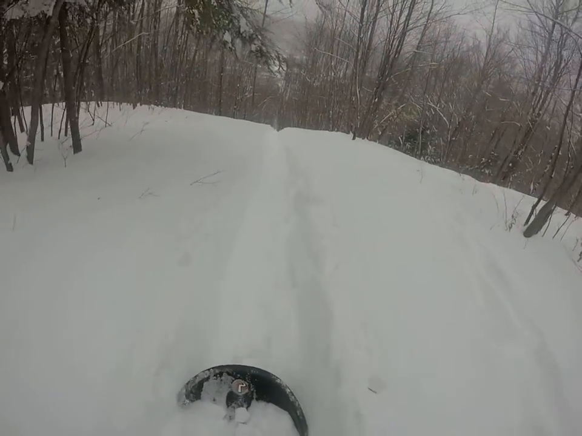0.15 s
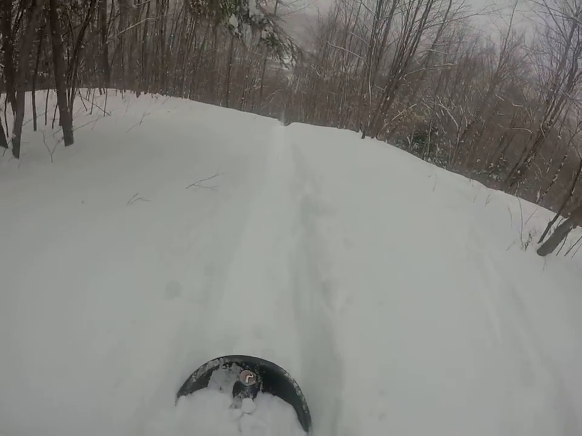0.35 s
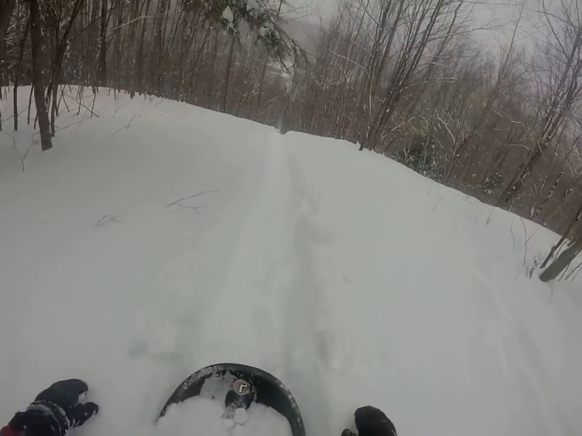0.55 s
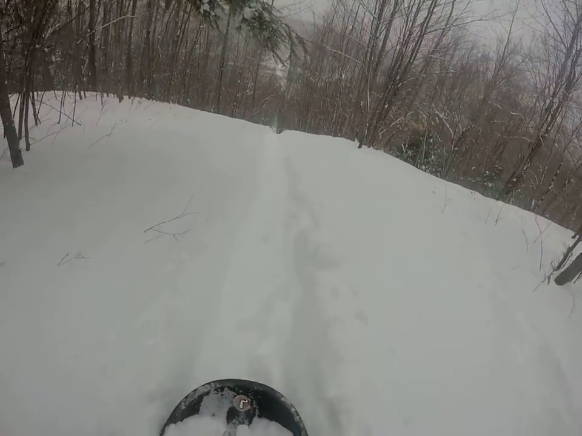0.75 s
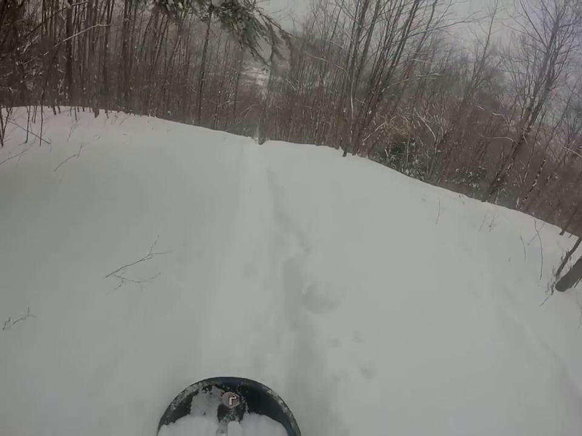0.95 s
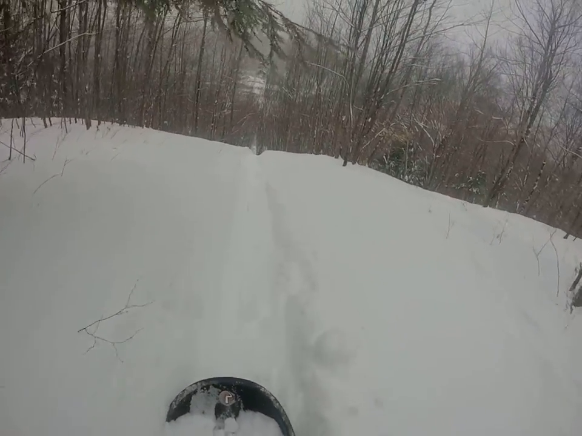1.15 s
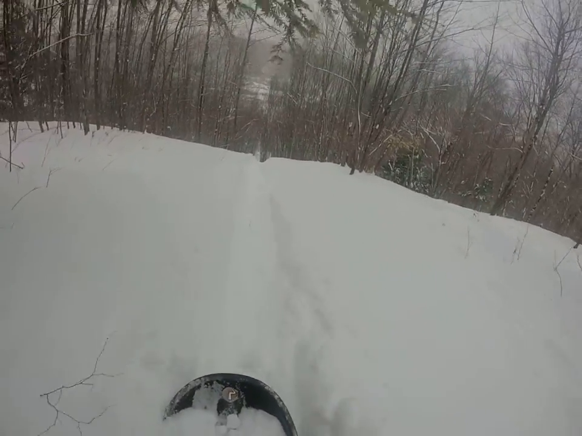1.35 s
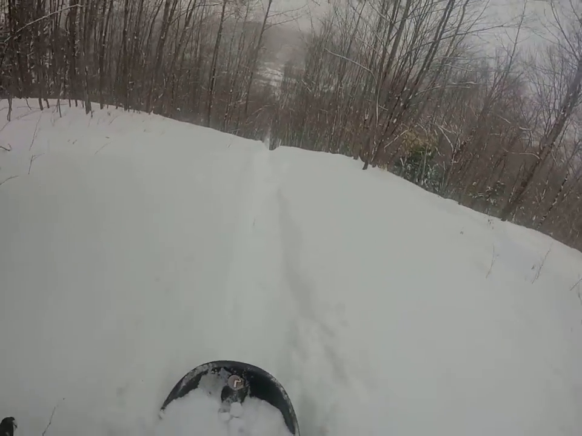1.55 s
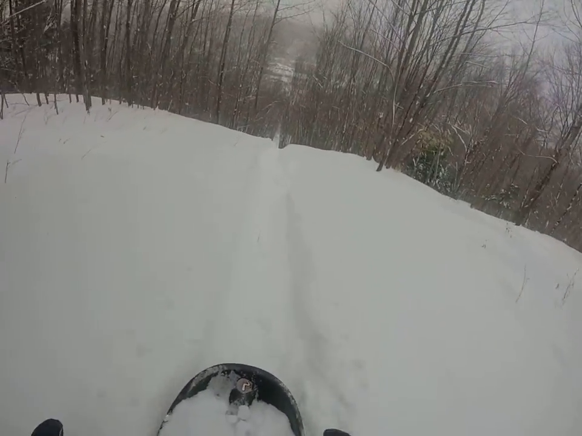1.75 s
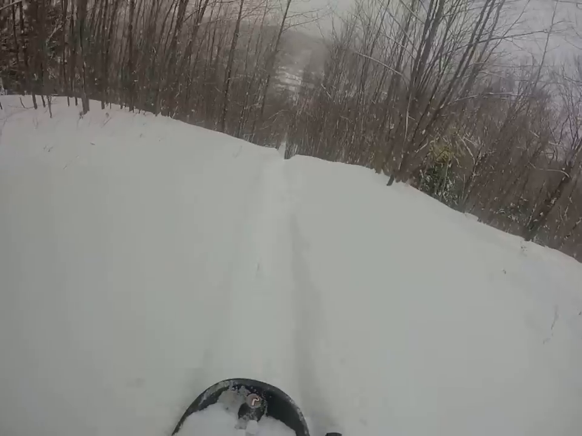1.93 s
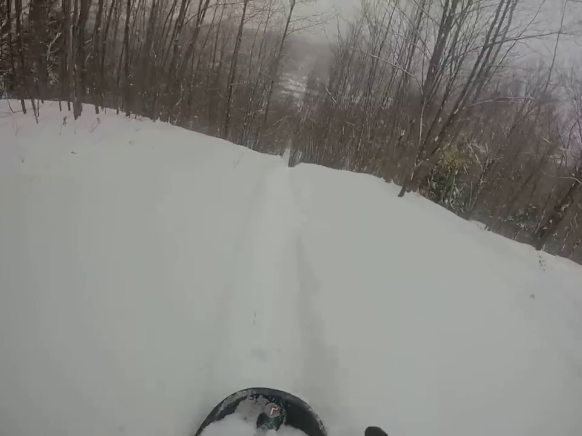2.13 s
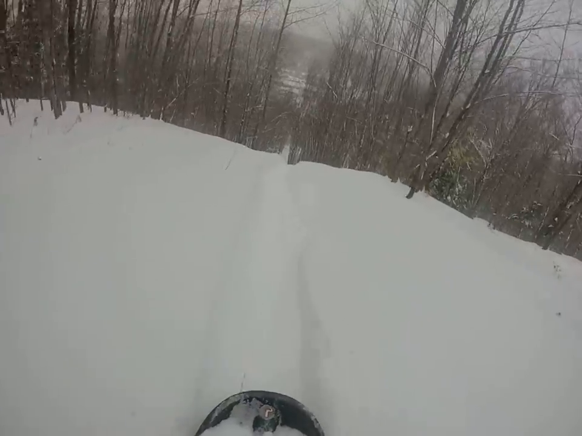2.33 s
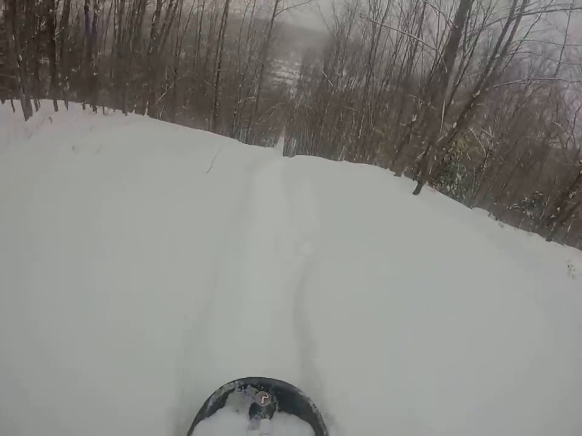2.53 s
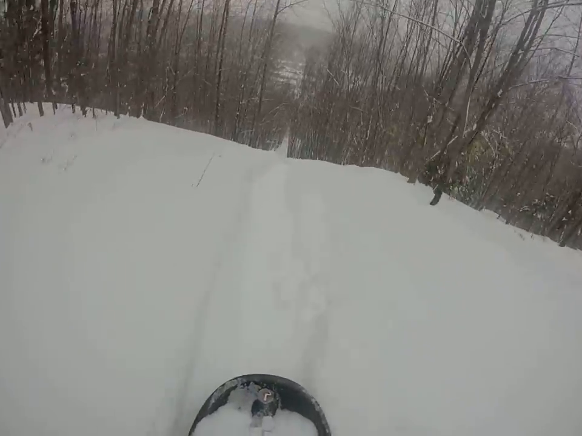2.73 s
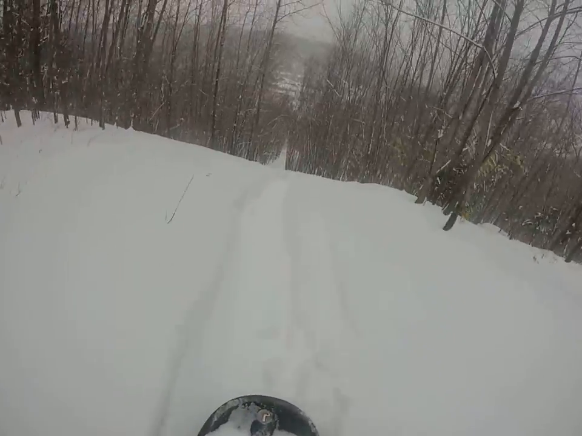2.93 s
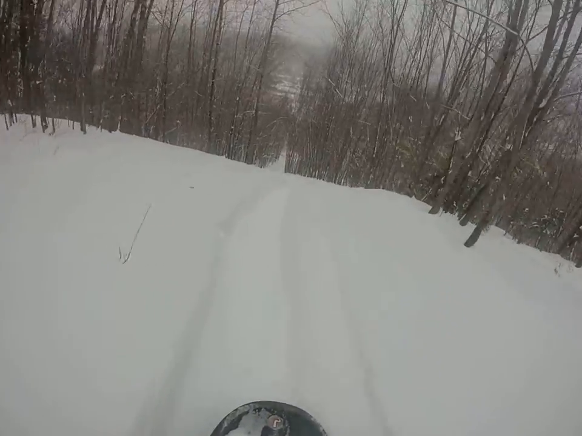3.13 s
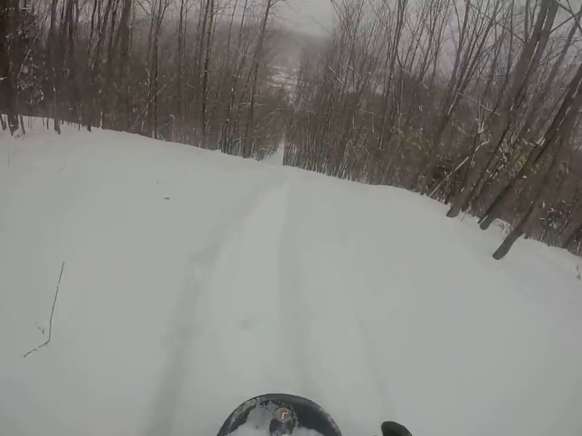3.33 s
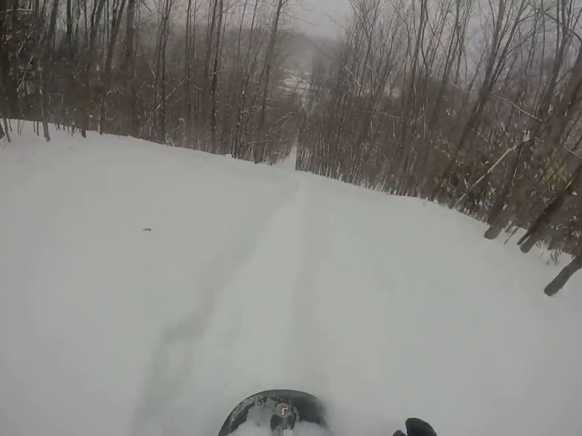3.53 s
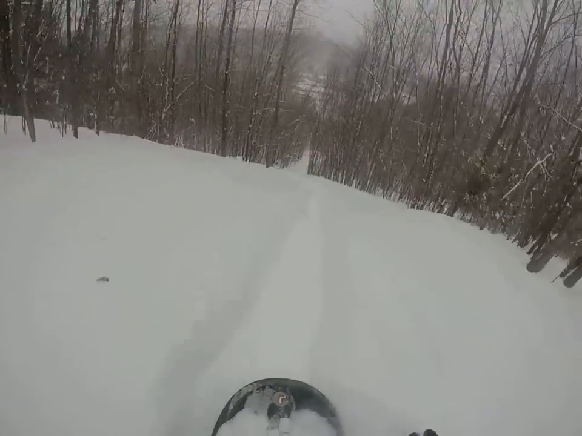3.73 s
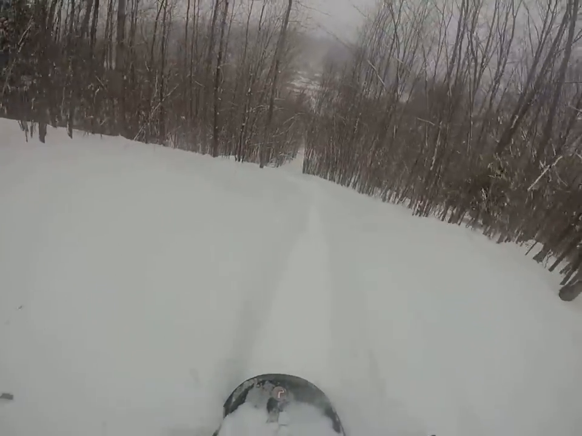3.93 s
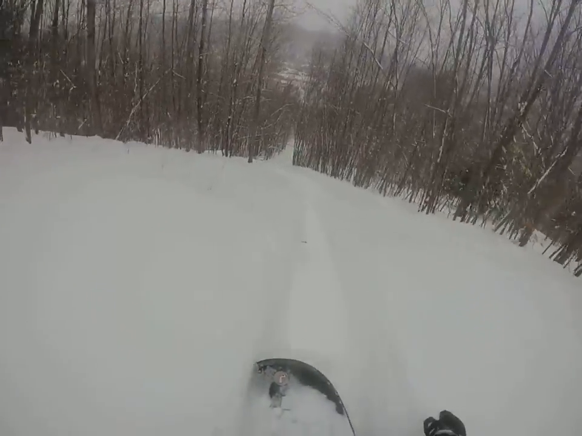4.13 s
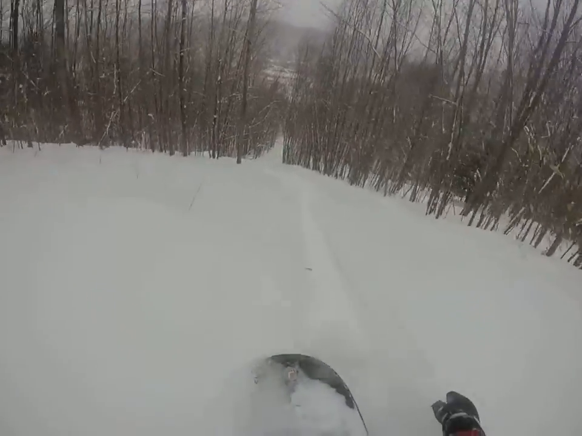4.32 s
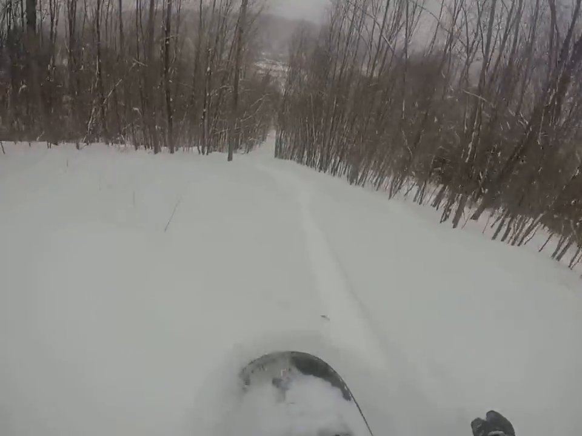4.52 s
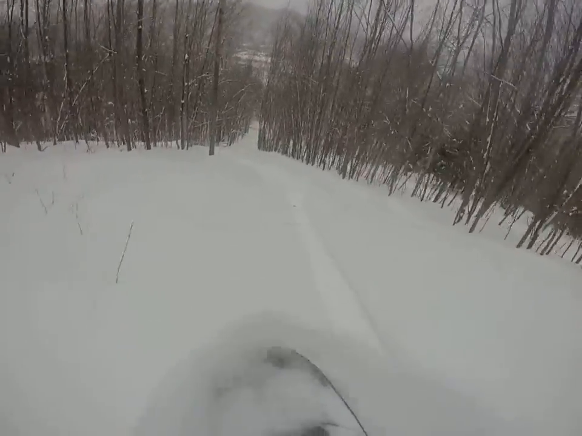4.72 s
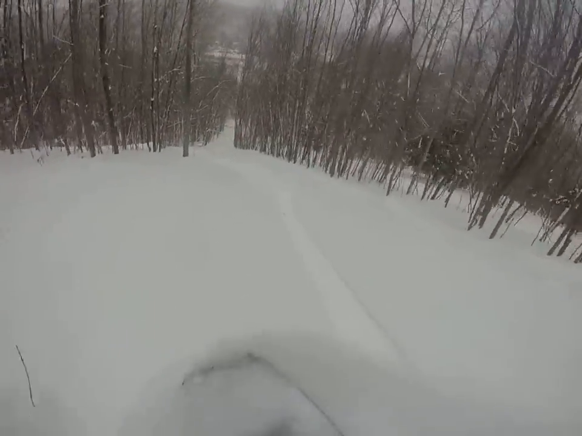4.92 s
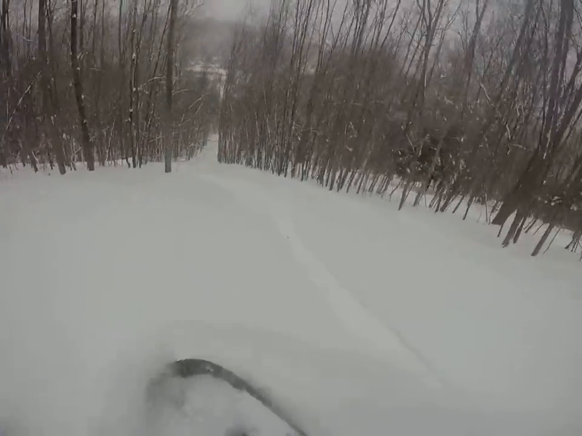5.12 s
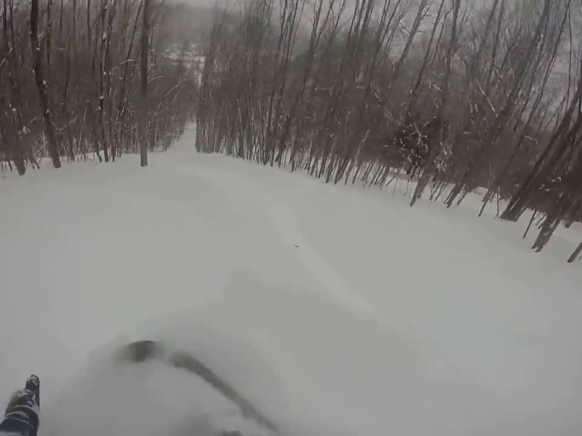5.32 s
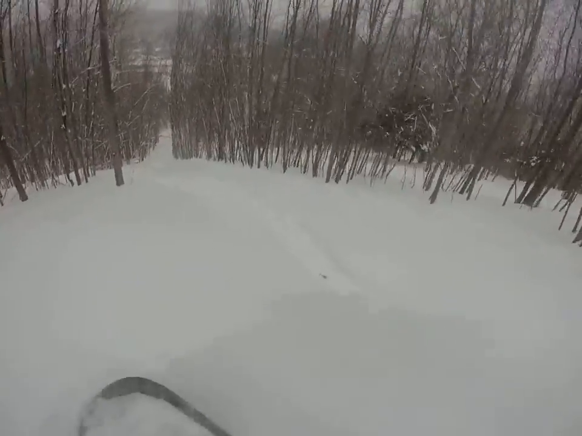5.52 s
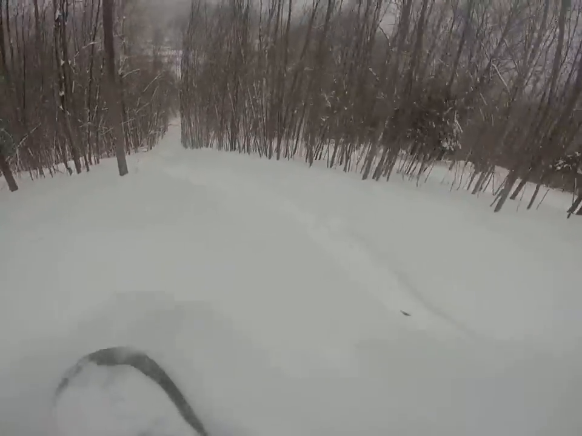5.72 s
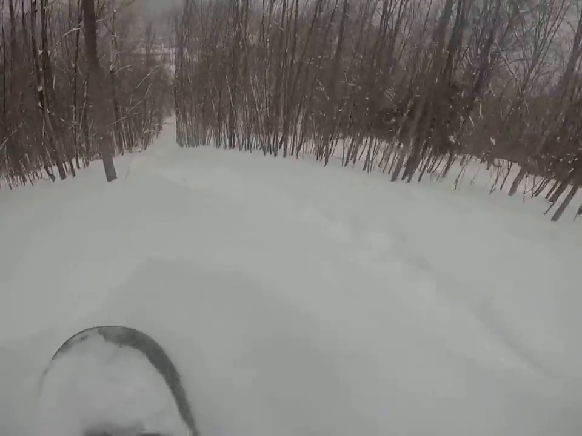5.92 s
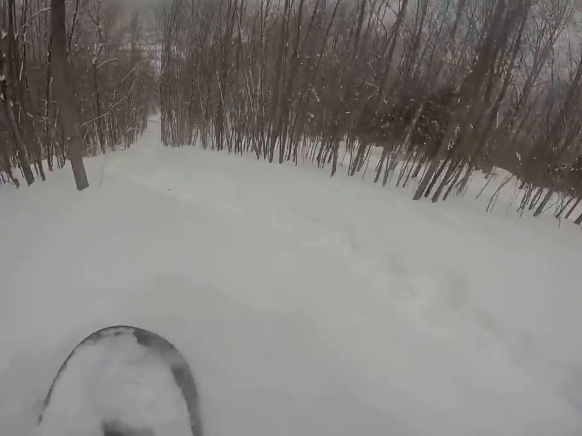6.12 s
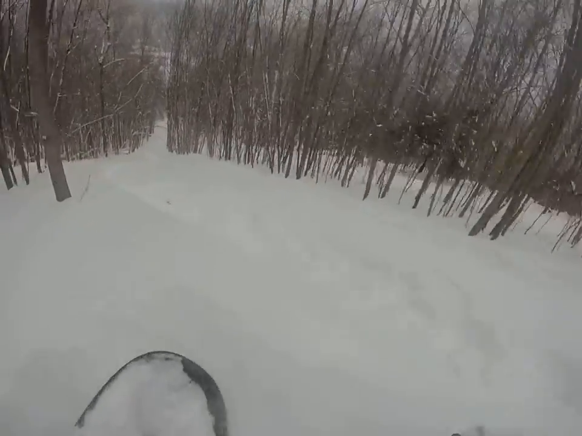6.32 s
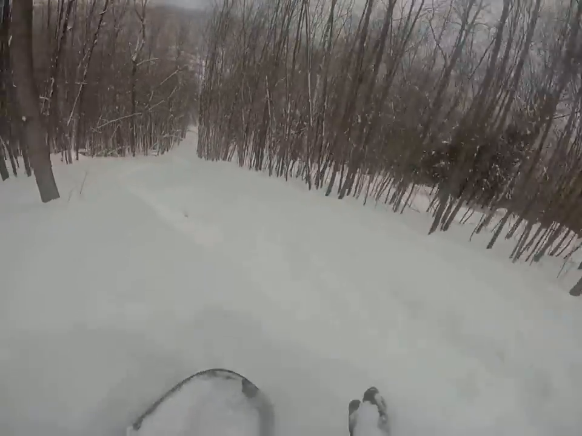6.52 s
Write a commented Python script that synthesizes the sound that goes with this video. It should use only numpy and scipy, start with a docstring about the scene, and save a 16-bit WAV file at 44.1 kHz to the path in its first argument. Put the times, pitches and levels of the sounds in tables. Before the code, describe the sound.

Close and dry outdoors, without echo: snow grains rub a thin plastic hull while fine powder hisses and patters past the microphone. Early on it is soft, broken by a gritty scrape and small ticks. Later the rubbing surges loud and bright, drops, and a low thump leads into two hard plastic knocks with crunching snow. Wind rumble and scattered ticks continue as the slide goes on.

```python
"""A plastic sled slides through deep powder: snow grains rub the hull into a ringing hiss that swells and fades.
Fine powder hisses and patters past, and bright ticks ring the case of a camera.
Short bursts of ringing plastic and gritty snow make sharp knocks; rounded pushes of pressure make soft thumps.
A glove scrapes the snow, short dull noises puff and thud, and low noise rumbles as gusts over a rush of air."""
import sys
import numpy as np
from scipy import signal
from scipy.fft import rfft, irfft
from scipy.io import wavfile

SR = 44100
rng = np.random.default_rng(int(sys.argv[2]) if len(sys.argv) > 2 else 0)


def master(y):
    """Save y as 16-bit WAV."""
    cut = np.clip(np.atleast_2d(y).T, -1, 1)
    pcm = np.round(cut * 32767)  # scale
    wavfile.write(sys.argv[1], SR, pcm.astype(np.int16))


N = 293706  # length of the scene in samples


def gain_of(db):
    """Turns decibels into a factor."""
    return 10 ** (np.asarray(db) / 20)


def evened(x):
    """Scales a sound to an average strength (rms) of 1."""
    return x / np.sqrt(np.mean(x ** 2) + 1e-20)


def follow(rows):
    """Draws straight lines between the rows, giving each column a value at every sample."""
    s, *columns = np.transpose(rows)
    return [np.interp(np.arange(N) / SR, s, column) for column in columns]


def swell(s, half_s):
    """A smooth rise and fall of height 1 around a moment, down to 37 % at half_s on either side."""
    return np.exp(-((np.arange(N) / SR - s) / half_s) ** 2)


def add(mix, s, sound):
    """Lays a sound into the mix at a time in seconds."""
    part = mix[max(round(s * SR), 0):][:len(sound)]
    part += sound[:len(part)]


def coloured(x, points):
    """Gives a sound a spectrum drawn through the points, at rms 1."""
    hz, db = np.transpose(points)
    f = np.fft.rfftfreq(N, 1 / SR)
    curve_db = np.interp(np.log(f + 1), np.log(hz), db)
    return evened(irfft(rfft(x) * gain_of(curve_db), N))


def resonated(x, modes):
    """Passes a sound through a set of steep-sided resonances, at rms 1."""
    f = np.fft.rfftfreq(N, 1 / SR)
    power = sum(gain_of(db) ** 2 / (1 + ((f - hz) / width) ** 2) ** 2 for hz, width, db in modes)
    return evened(irfft(rfft(x) * np.sqrt(power), N))


def wander(per_s):
    """A smooth random curve of rms 1; changes much faster than per_s (Hz) are faded out."""
    f = np.fft.rfftfreq(N, 1 / SR)
    slow = np.exp(-(f / per_s) ** 2)
    return evened(irfft(rfft(rng.standard_normal(N)) * slow, N))


def grains(per_s, spread_db, largest=4):
    """Random clicks, per_s of them each second on average: many small, a few large."""
    size = gain_of(spread_db * np.minimum(rng.exponential(1, N), largest))
    happens = rng.random(N) < per_s / SR
    return size * rng.choice([-1, 1], N) * happens


def ring(modes, phases):
    """Tones that die away together after one blow, with peak 1."""
    t = np.arange(SR // 20) / SR
    sound = 0
    for (hz, db, t60), phase in zip(modes, phases):
        sound = sound + gain_of(db - 60 * t / t60) * np.sin(2 * np.pi * (hz * t + phase))
    return sound / abs(sound).max()


# Snow rubbing the hull. Each row: time in seconds, pressure (level of the lower ring) in dB,
# bite (level of the upper ring) in dB, both before a small trim.
SLIDE = [(0.0, -59.5, -63.5), (0.33, -64, -65.5), (0.89, -62, -64), (1.26, -65.5, -67.5),
         (1.67, -62.5, -63), (1.87, -65, -67), (2.39, -63.5, -66), (2.95, -60.5, -68.5),
         (3.1, -59.5, -64.5), (3.8, -54, -63), (4.43, -45.5, -48.5), (4.58, -45.5, -50),
         (4.97, -48.5, -57.5), (5.12, -49.5, -58), (5.38, -53, -66.5), (5.62, -54.5, -64.5),
         (5.97, -59.5, -63), (6.66, -55, -65)]
# Lower resonances of the hull. Each row: pitch in Hz, width in Hz, relative strength in dB.
HULL_LOW = [(613, 91, -11.5), (659.6, 18, -2), (1160, 940, -17.5), (1733, 64, 2), (1890, 160, -5.5),
            (1940, 267, 1.5), (2180, 100, -3), (2405, 77, 1.5), (2530, 130, 0)]
# Upper resonances of the hull. Each row: pitch in Hz, width in Hz, relative strength in dB.
HULL_HIGH = [(2800, 106, -1), (3125, 190, 1), (3393, 150, 2), (3665, 160, -2), (4310, 170, -7)]
# Lumps and hollows in the snow that load and unload the hull.
# Each row: middle in seconds, extra pressure in dB, extra bite in dB, half length in seconds.
LUMPS = [(3.06, 2.5, 1, 0.072), (3.64, -1, -2.5, 0.068), (4.033, 1.5, 3.5, 0.033), (4.18, 3, 8, 0.013),
         (4.25, -9, 0, 0.0093), (4.303, 0, 4, 0.027), (4.506, 2, 0, 0.03), (4.645, -1.5, -3.5, 0.018),
         (4.745, -1, 2.5, .014), (4.869, 1.5, 6, 0.014), (4.99, 1.5, 1, 0.086), (5.175, 2.5, -3, 0.0088),
         (5.253, -8.5, -3, 0.033), (5.411, 8.5, 12, 0.02), (5.508, -5.5, 2, 0.049), (5.595, -7, -6, 0.013),
         (5.684, 3.5, 2.5, 0.083), (6.334, 2.5, 1, 0.22)]


def hull(low_db=-0.23, high_db=-1, grains_per_s=4000, spread_db=2.0, uneven_db=0.49, bite_uneven_db=1.0):
    """Snow grains rub the hull into ringing; deeper bite wakes its upper resonances, in uneven spurts."""
    pressure_db, bite_db = follow(SLIDE)
    for s, press_db, dig_db, half_s in LUMPS:
        lump = swell(s, half_s)
        pressure_db = pressure_db + press_db * lump
        bite_db = bite_db + dig_db * lump
    rubbing = grains(grains_per_s, spread_db) * gain_of(uneven_db * wander(30))
    low = resonated(rubbing, HULL_LOW)
    high = resonated(rubbing, HULL_HIGH)
    spurts_db = bite_uneven_db * wander(24)
    return gain_of(low_db + pressure_db) * low + gain_of(high_db + bite_db + spurts_db) * high


BOOM_HZ, BOOM_WIDTH_HZ = 66, 10.4  # the whole hull flexing
BOOM_DB, BOOM_FOLLOW = -59.5, 0.61  # level at the hardest pressure in SLIDE, and its dB per dB of pressure


def boom():
    """The hull flexes in one deep mode, stronger as the snow presses on it."""
    pressure_db, _ = follow(SLIDE)
    level_db = BOOM_DB + BOOM_FOLLOW * (pressure_db - pressure_db.max())
    return gain_of(level_db) * resonated(rng.standard_normal(N), [(BOOM_HZ, BOOM_WIDTH_HZ, 0)])


# Ring of the camera case. Each row: pitch in Hz, relative strength in dB,
# time to fall by 60 dB in seconds.
CASE = [(2050, -22, 0.004), (3600, -1, 0.0027), (5000, 0, 0.0022), (6960, -3, 0.0028), (9480, -5, 0.002),
        (11030, -8, 0.0026), (12800, -15, 0.0017)]


def case_tap(bright_hz, focus_db, phases):
    """One tap on the camera case; modes weaken by focus_db per octave away from the brightest."""
    modes = [(hz, db - focus_db * abs(np.log2(hz / bright_hz)), t60) for hz, db, t60 in CASE]
    return ring(modes, phases)


# Fine powder spraying past. Each row: time in seconds, hiss in dB, dry top in dB, both before trims.
SPRAY = [(0.0, -66, -74), (0.35, -68, -75.5), (3.11, -69.5, -74.5), (3.38, -69.5, -72), (4.06, -68, -72.5),
         (4.32, -66.5, -73), (5.19, -67, -69.5), (5.47, -68, -71), (6.66, -69.5, -71)]
# Spectrum of the hiss. Each row: frequency in Hz, relative strength in dB per Hz.
SPRAY_COLOUR = [(1200, -8), (3400, 4.5), (4300, 4), (4700, -0.5), (5100, 3.5), (5650, -3), (6250, 5),
                (6900, 3), (7250, -5), (7900, -2), (9300, -7), (12000, -16), (15000, -43)]
# Spectrum of the noise in the dry top. Each row: frequency in Hz, relative strength in dB per Hz.
SPARKLE = [(2500, -47), (5000, -4.5), (7300, -6.5), (9300, -7), (11500, -7.5), (13500, -7), (15000, -15)]
# Puffs of loose powder. Each row: middle in seconds, extra hiss in dB, half length in seconds.
PUFFS = [(1.7, 4, 0.064), (4.5, 2, 0.1), (5.37, 3.5, 0.087), (5.948, 4, 0.064)]


def spray(hiss_db=2.0, sparkle_db=-0.5, patter_db=-0.5, patter_per_s=260, spread_db=6.5, uneven_db=2.0):
    """Powder hisses, swelling in puffs; single crystals patter, denser as more dry snow flies."""
    level_db, top_db = follow(SPRAY)
    puffs_db = sum(db * swell(s, half_s) for s, db, half_s in PUFFS)
    hiss = coloured(rng.standard_normal(N), SPRAY_COLOUR)
    sparkle = coloured(rng.standard_normal(N), SPARKLE) * gain_of(uneven_db * wander(15))
    rate = patter_per_s * gain_of(top_db - top_db.max()) ** 2
    # crystals land on different spots of the case, each favouring one of its modes
    taps = [case_tap(hz, 9.8, rng.random(len(CASE))) for hz, _, _ in CASE[1:]]
    patter = np.zeros(N)
    for tap in taps:
        crystals = grains(rate / len(taps), spread_db)
        patter += signal.oaconvolve(crystals, tap)[:N]
    top = gain_of(sparkle_db) * sparkle + gain_of(patter_db) * evened(patter)
    return gain_of(level_db + hiss_db + puffs_db) * hiss + gain_of(top_db) * top


# Bright ticks on the camera case, a few together with a knock. Each row: start in seconds,
# peak in dB before a shared lift, brightest frequency in Hz.
TICKS = [(.3588, -47, 9100), (.9957, -42, 6850), (1.814, -48.5, 8400), (3.1533, -44.5, 9600),
         (3.305, -40, 4600), (3.3825, -41, 7000), (4.466, -35, 6550), (4.532, -46, 7500),
         (4.6031, -38, 4370), (4.6040, -36.5, 9400), (4.8484, -40, 8850), (5.3017, -44.5, 12000),
         (5.3276, -40, 6400), (5.36, -36.5, 6460), (5.3687, -36, 5600), (5.6163, -32, 6460),
         (5.7545, -42.5, 6600), (5.9072, -38, 4040), (6.087, -41, 3640), (6.1404, -35, 4540),
         (6.2407, -40, 8800), (6.4486, -43, 7500)]


def ticks(lift_db=3, focus_db=11):
    """Bright ticks on the camera case, a few together with a knock: each is one tap that rings it."""
    out = np.zeros(N)
    for (s, peak_db, bright_hz), phases in zip(TICKS, rng.random((len(TICKS), len(CASE)))):
        add(out, s, gain_of(peak_db + lift_db) * case_tap(bright_hz, focus_db, phases))
    return out


# Knocks of the sled, and ticks as the glove scrapes. Each row: start in seconds, ring in dB,
# ring pitch in Hz, crack in dB, crunch in dB; ring and crack are peaks before the final filter.
KNOCKS = [(0.6625, -44, 3650, -43, -56), (0.905, -46, 2980, -60, -58), (0.916, -43, 3020, -60, -58),
          (0.927, -45, 2760, -47, -54), (0.93, -43, 2200, -54, -58), (0.945, -42, 2500, -56, -60),
          (1.0324, -40, 2150, -57, -48), (1.036, -45, 2640, -60, -55), (1.081, -48, 3360, -63, -66),
          (1.11, -48, 3700, -61, -59), (3.4294, -39.5, 1860, -41, -62), (4.6030, -32.5, 3400, -38, -50),
          (4.6036, -36, 1980, -52, -46), (5.2829, -31.5, 2570, -47, -42), (5.2857, -35, 1880, -52, -53),
          (5.404, -26.5, 1840, -29, -40), (5.4051, -26, 2520, -34, -46), (5.4104, -27, 2670, -37, -49),
          (5.5502, -41, 1900, -47, -53), (5.615, -34, 3830, -32, -57), (5.6166, -35, 1670, -45, -52),
          (5.618, -34, 2950, -45, -50), (5.629, -36, 1950, -51, -46), (5.668, -30.5, 2840, -38, -53),
          (5.6704, -36, 2850, -37.5, -54), (6.448, -39, 3930, -42, -62), (6.546, -36, 2370, -52, -47),
          (6.549, -38, 2550, -46, -43.5)]
# What a blow rings in the plastic. Each row: pitch in Hz, relative strength in dB,
# time to fall by 60 dB in seconds.
CRACK = [(1670, -20, 0.032), (1600, 2, 0.014), (2560, 3, 0.016), (3160, 1.5, 0.013), (4000, -1.5, 0.0073),
         (5080, 7, 0.0051), (6380, -2.5, 0.01), (6800, 5, 0.0034), (9200, 4, 0.0027)]
KNOCK_T60_S = 0.007  # snow damps the plastic quickly


def knocks(rise_s=0.00022, rebound_s=0.0023, rebound_db=-12, thin_hz=1250, soft_hz=9500):
    """Knocks of the sled and ticks as the glove scrapes: a short ring, a crack and a weaker rebound."""
    out, t = np.zeros(N), np.arange(SR // 20) / SR
    for (s, ring_db, hz, crack_db, _), phases in zip(KNOCKS, rng.random((len(KNOCKS), 2, len(CRACK)))):
        spot = ring([(hz, 0, KNOCK_T60_S)], [0]) * (1 - np.exp(-t / rise_s))
        add(out, s, gain_of(ring_db) * spot / abs(spot).max())
        add(out, s, gain_of(crack_db) * ring(CRACK, phases[0]))
        add(out, s + rebound_s, gain_of(crack_db + rebound_db) * ring(CRACK, phases[1]))
    # the blow holds little bass, and, as the plastic gives way, little of the highest treble
    band = signal.butter(3, [thin_hz, soft_hz], "bandpass", fs=SR, output="sos")
    return signal.sosfilt(band, out)


CRUNCH_BAND_HZ, CRUNCH_T60_S = (1250, 3460), 0.013  # packed snow that gives way under a blow


def crunches(order=2):
    """With each row of KNOCKS packed snow crumbles: a short, fading burst of gritty noise."""
    out, t = np.zeros(N), np.arange(SR // 20) / SR
    band = signal.butter(order, CRUNCH_BAND_HZ, "bandpass", fs=SR, output="sos")
    fade = np.exp(-np.log(1000) * t / CRUNCH_T60_S)
    for (s, *_, crunch_db), grit in zip(KNOCKS, rng.standard_normal((len(KNOCKS), len(t)))):
        add(out, s, gain_of(crunch_db) * fade * evened(signal.sosfilt(band, grit)))
    return out


# Soft shoves of snow and air as the sled rides and drops. Each row: middle in seconds,
# peak in dB, quickness in Hz (higher is shorter; the tone is strongest at about 0.7 of it).
THUMPS = [(0.823, -37.5, 11), (1.653, -35.5, 22), (5.168, -43, 160), (5.19, -23.5, 35), (5.217, -23.5, 60),
          (5.228, -31, 97), (5.253, -24, 37), (5.235, -14, 30.5), (5.395, -36, 22), (5.478, -30.5, 18.5)]


def thumps(cycles=0.44):
    """Each shove is one rounded push of pressure, with a slight suction on either side."""
    out, t = np.zeros(N), np.arange(-SR // 10, SR // 10) / SR
    for s, db, hz in THUMPS:
        distance = (hz * t / cycles) ** 2  # squared distance from the middle
        add(out, s + t[0], gain_of(db) * (1 - 2 * distance) * np.exp(-distance))
    return out


# Dull low puffs and thuds, several under the knocks. Each row: middle in seconds, level in dB,
# half length in seconds, pitch in Hz.
THUDS = [(0.25, -59, 0.12, 151), (1.746, -67.5, 0.26, 175), (5.175, -52.5, 0.0097, 288),
         (5.285, -55, 0.0059, 423), (5.333, -65, 0.061, 450), (5.406, -46.5, 0.012, 248),
         (5.408, -53.5, 0.012, 625), (5.442, -53.5, 0.0063, 325), (5.633, -50.5, 0.0056, 610)]


def thuds(relative_width=0.44):
    """Dull low puffs and thuds, several under the knocks: short rustles of broadly tuned noise."""
    out = np.zeros(N)
    for s, db, half_s, hz in THUDS:
        rustle = resonated(rng.standard_normal(N), [(hz, relative_width * hz, 0)])
        out += gain_of(db) * swell(s, half_s) * rustle
    return out


# Spectrum of the scrape. Each row: frequency in Hz, relative strength in dB per Hz.
GLOVE_COLOUR = [(700, -38), (1300, -15), (1700, 1), (2400, -1), (2950, 4.5), (3400, -13), (4200, -19),
                (6700, -18), (9000, -29), (15000, -41)]
GLOVE_IN_S, GLOVE_OUT_S = 0.918, 1.0  # the glove is deepest in the snow; it lifts out
DIG_DB, DIG_RISE_S, DIG_FALL_S = -48, 0.056, 0.014  # the scrape as it digs in
DRAG_DB, LIFT_S = -56, 0.046  # the lighter drag that follows, and its release


def glove(grains_per_s=2000, spread_db=2.0):
    """A short gritty scrape of snow grains: the glove digs in, drags lightly and lifts out."""
    t = np.arange(N) / SR
    dig = np.where(t < GLOVE_IN_S, swell(GLOVE_IN_S, DIG_RISE_S), swell(GLOVE_IN_S, DIG_FALL_S))
    drag = (t > GLOVE_IN_S) * np.exp(-np.maximum(t - GLOVE_OUT_S, 0) / LIFT_S)
    force = np.maximum(gain_of(DIG_DB) * dig, gain_of(DRAG_DB) * drag)
    return force * coloured(grains(grains_per_s, spread_db), GLOVE_COLOUR)


# Spectrum of the buffeting. Each row: frequency in Hz, relative strength in dB per Hz.
BUFFET_COLOUR = [(3, -1), (11, 13), (20, 7), (32, -3), (50, -7), (72, -12.5), (100, -29), (200, -48),
                 (600, -58)]
# Spectrum of the steady rush of air. Each row: frequency in Hz, relative strength in dB per Hz.
RUSH = [(20, -1.5), (70, 2), (140, 0), (270, -3.5), (450, -7), (700, -9.5), (1200, -12), (2000, -12.5),
        (4000, -35), (9000, -43)]
# Gusts on the microphone. Each row: middle in seconds, peak level in dB before a shared lift,
# half length in seconds.
GUSTS = [(0.832, -52, 0.22), (1.664, -59, 0.06), (5.25, -42, 0.18), (5.417, -37.5, 0.047),
         (5.662, -46.5, 0.12), (6.195, -45.5, 0.15), (6.54, -40, 0.12)]
# buffeting between gusts, before the same lift, growing as the sled gathers speed
CALM_DB, CALM_RISE_DB_PER_S = -56.5, .2


def air(lift_db=3, rush_db=-60):
    """Air buffets the microphone as low noise in gusts, over a steady soft rush."""
    calm = gain_of(CALM_DB + CALM_RISE_DB_PER_S * np.arange(N) / SR)
    gusts = sum(gain_of(db) * swell(s, half_s) for s, db, half_s in GUSTS)
    buffet = gain_of(lift_db) * (calm + gusts) * coloured(rng.standard_normal(N), BUFFET_COLOUR)
    return buffet + gain_of(rush_db) * coloured(rng.standard_normal(N), RUSH)


def scene():
    """Everything is close and dry: powder snow returns no echo."""
    sliding = hull() + boom() + spray() + ticks()
    blows = knocks() + crunches() + thumps() + thuds()
    return (sliding + blows + glove() + air())[None]


EDGE_HZ = 15350  # where the treble is cut off


def record(dry):
    """A low-pass filter removes the highest treble."""
    low_pass = signal.firwin(201, EDGE_HZ, window=("kaiser", 8), fs=SR)
    return signal.oaconvolve(dry, low_pass[None], "same")


dry = scene()
out = record(dry)
master(out)
```